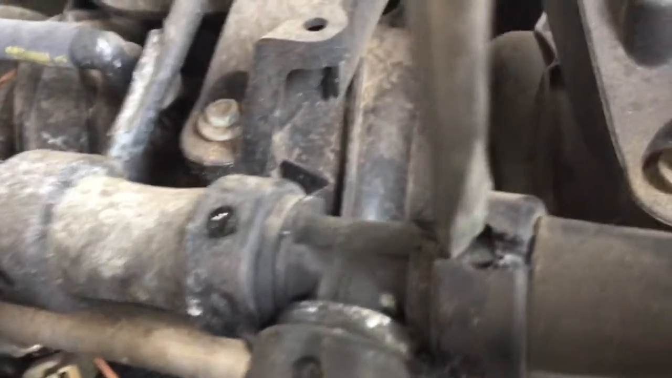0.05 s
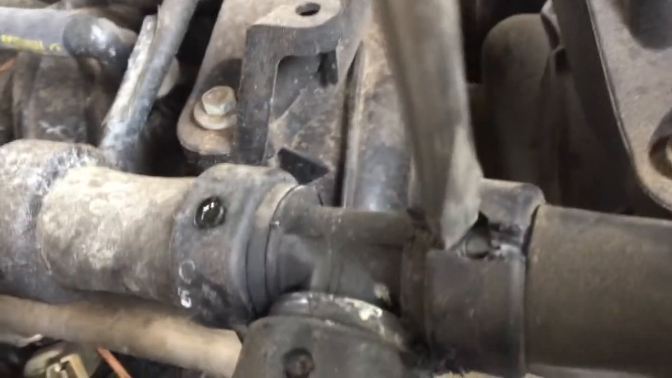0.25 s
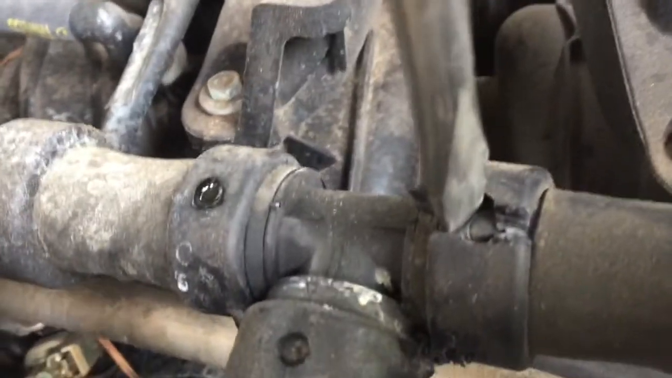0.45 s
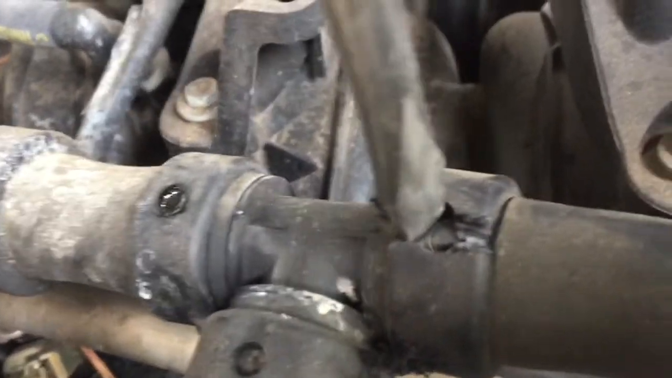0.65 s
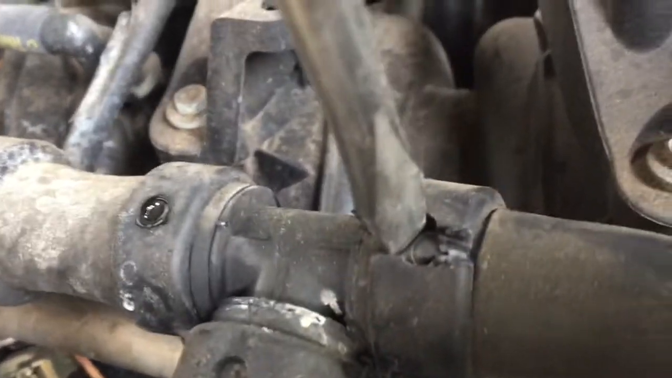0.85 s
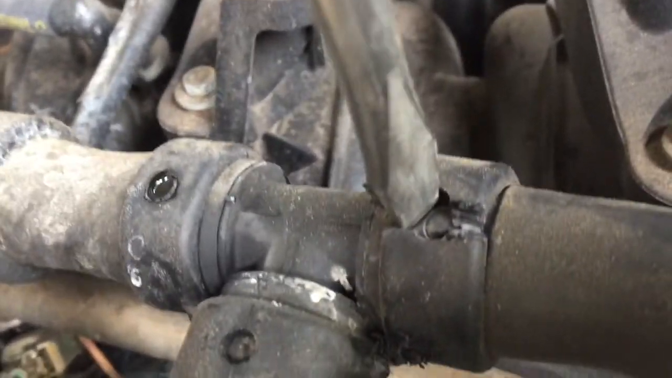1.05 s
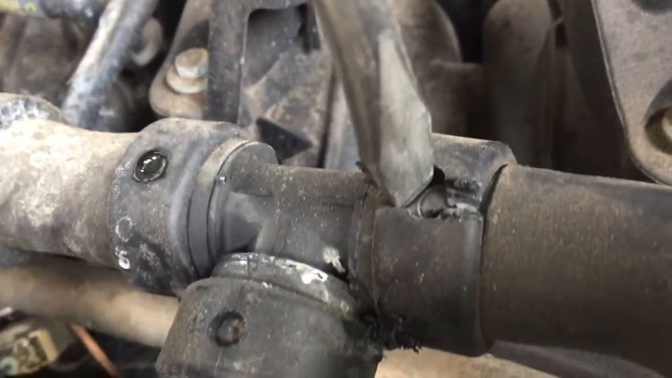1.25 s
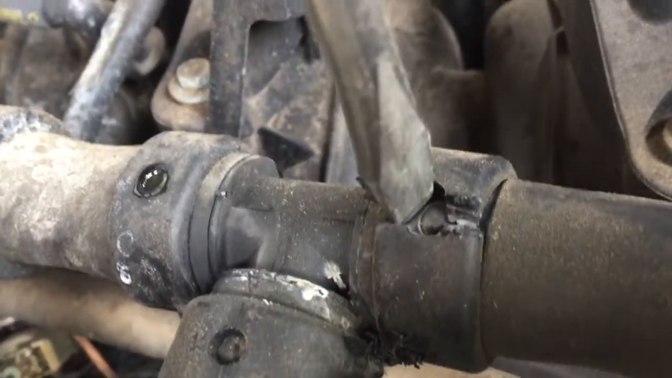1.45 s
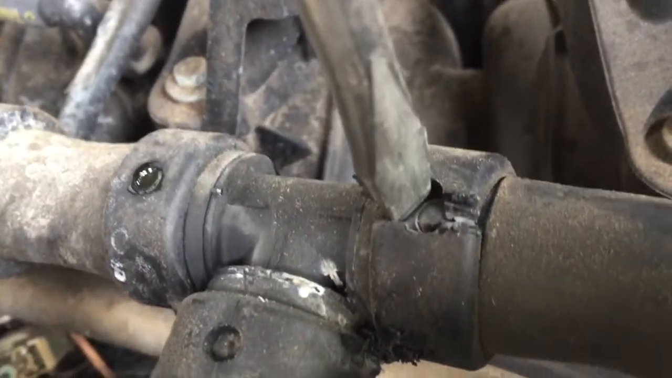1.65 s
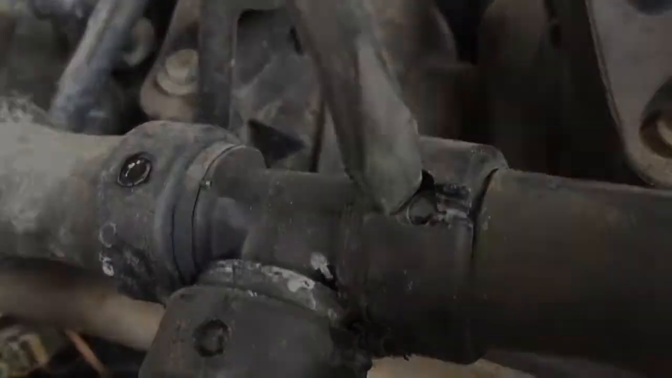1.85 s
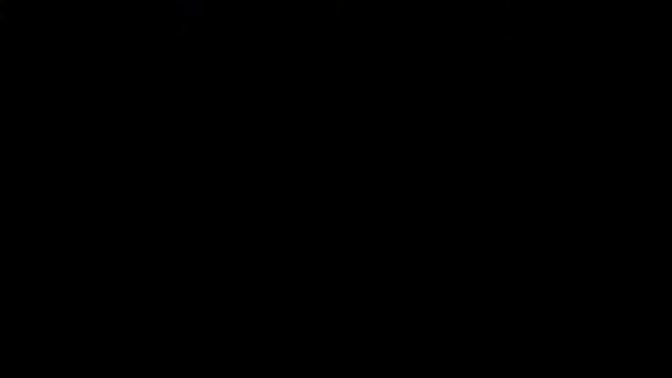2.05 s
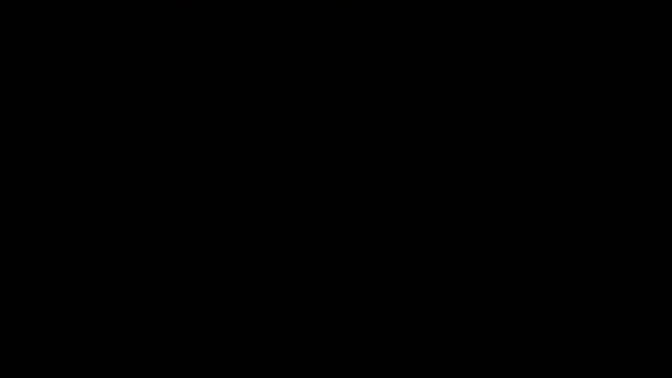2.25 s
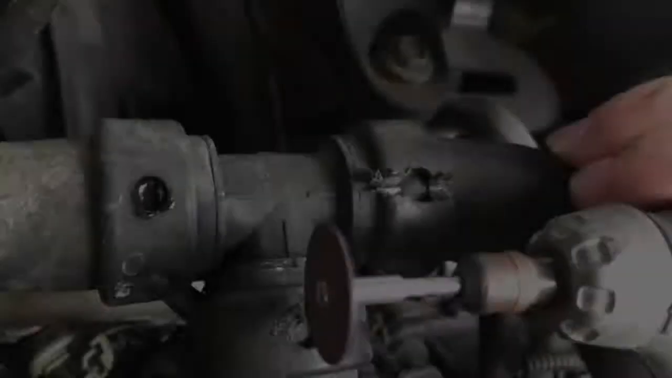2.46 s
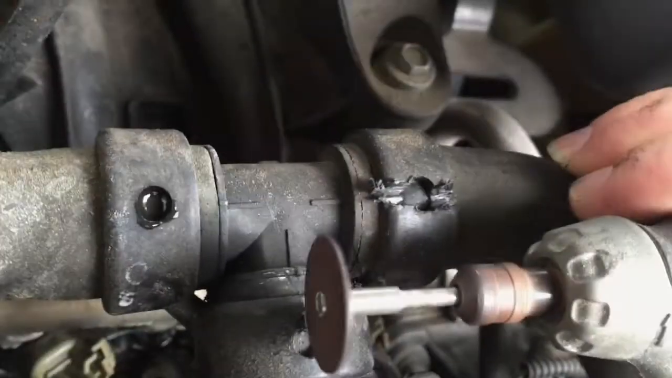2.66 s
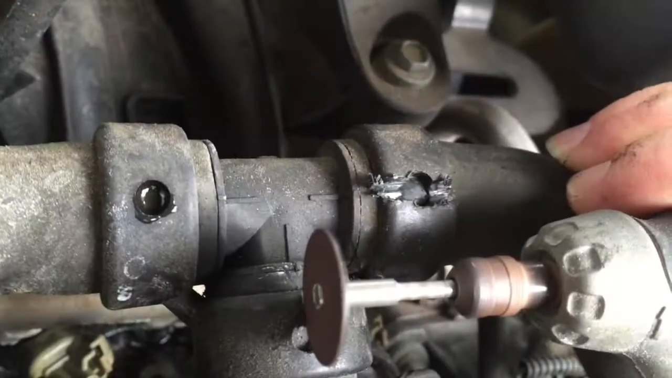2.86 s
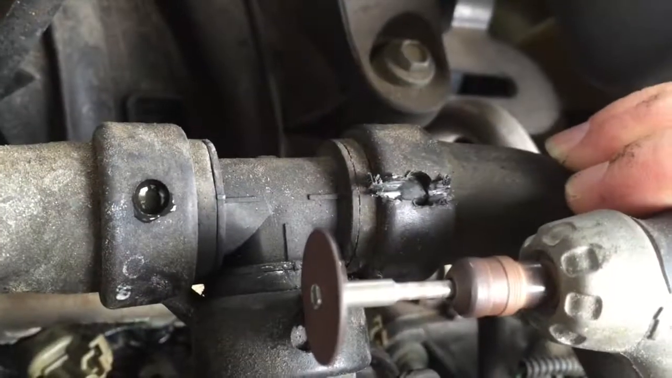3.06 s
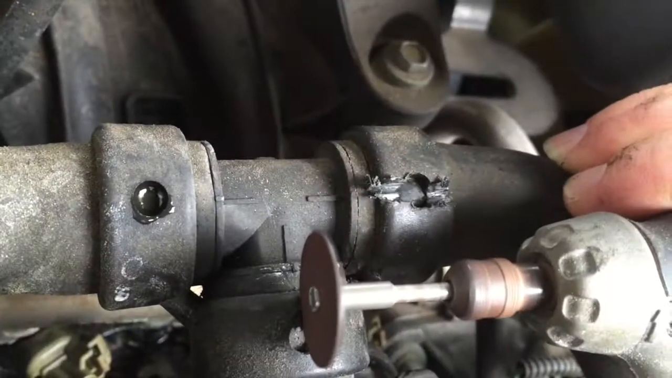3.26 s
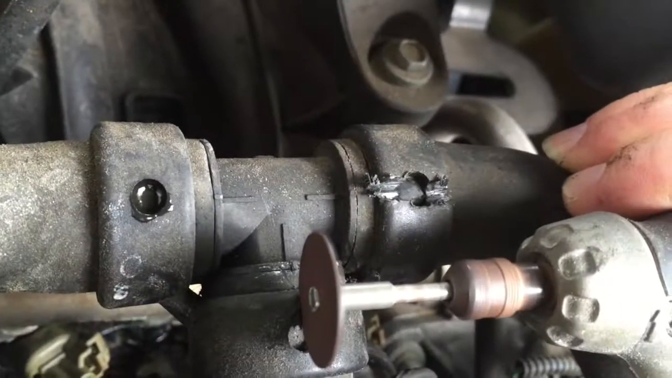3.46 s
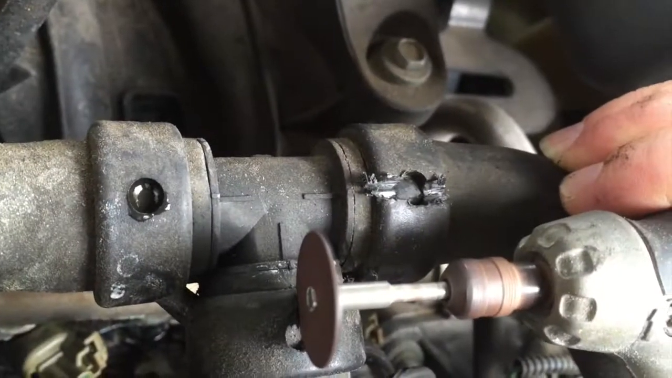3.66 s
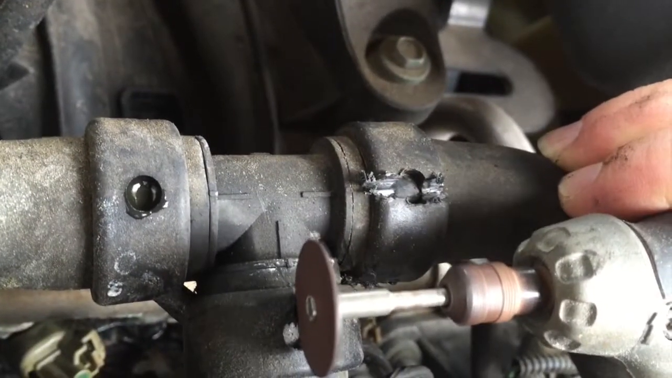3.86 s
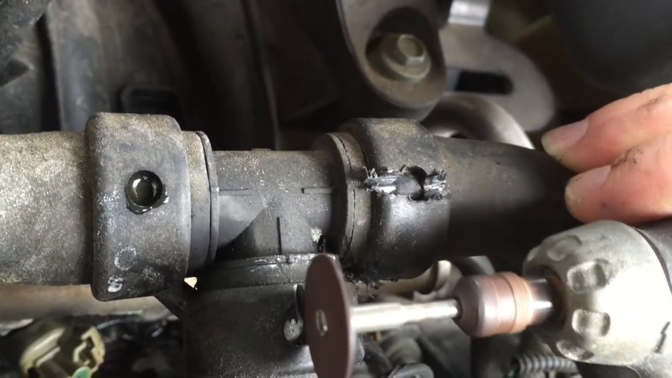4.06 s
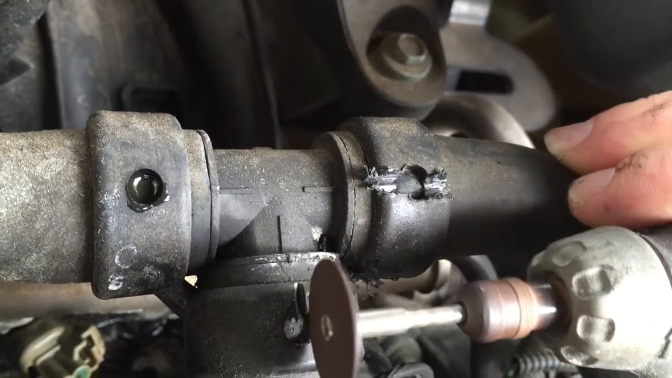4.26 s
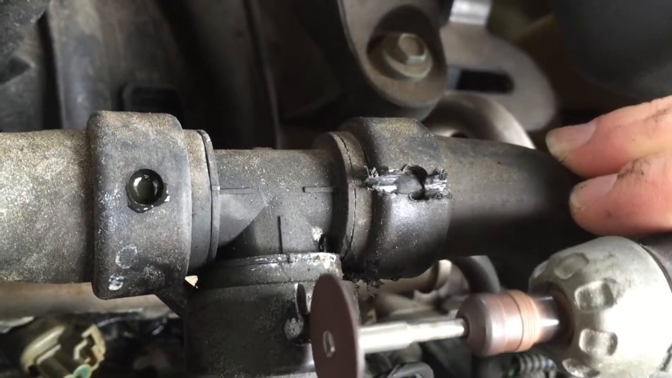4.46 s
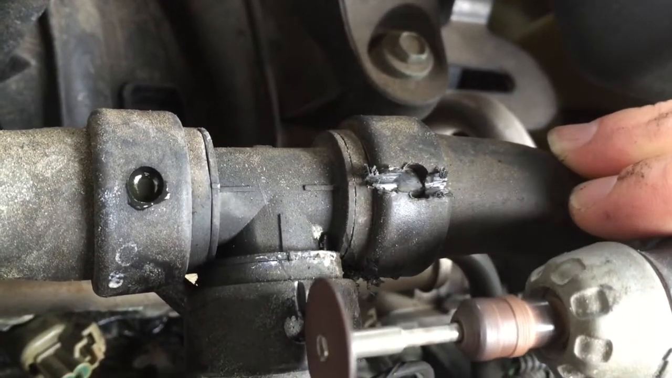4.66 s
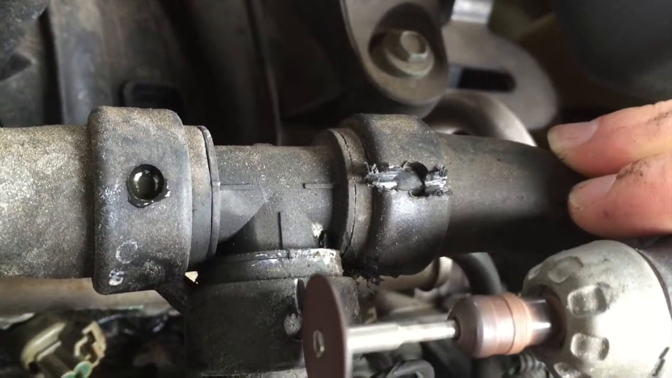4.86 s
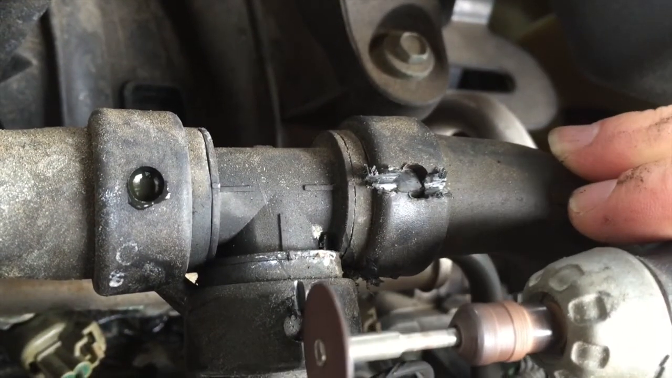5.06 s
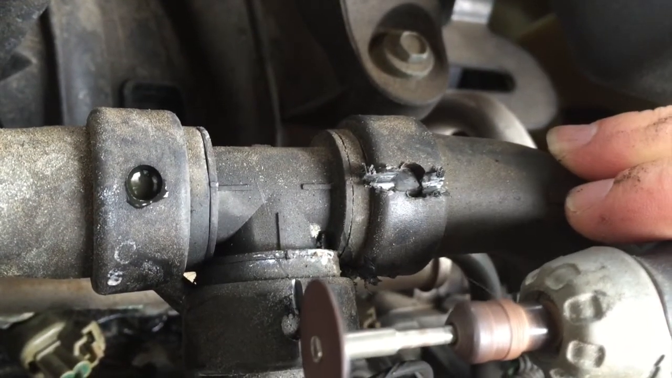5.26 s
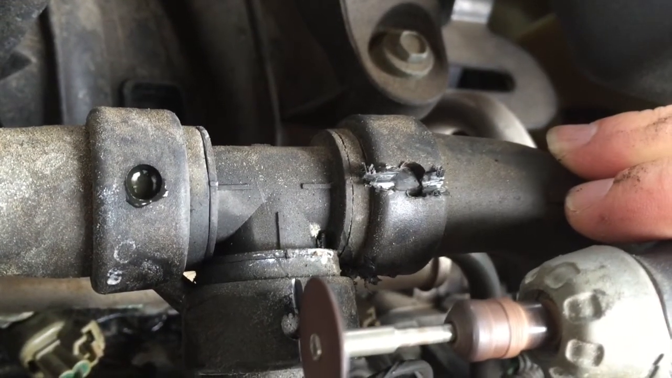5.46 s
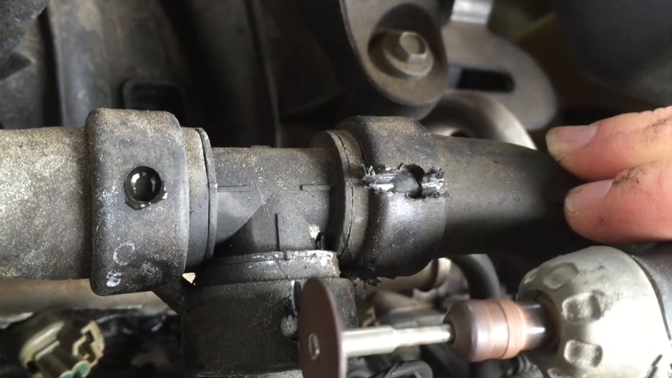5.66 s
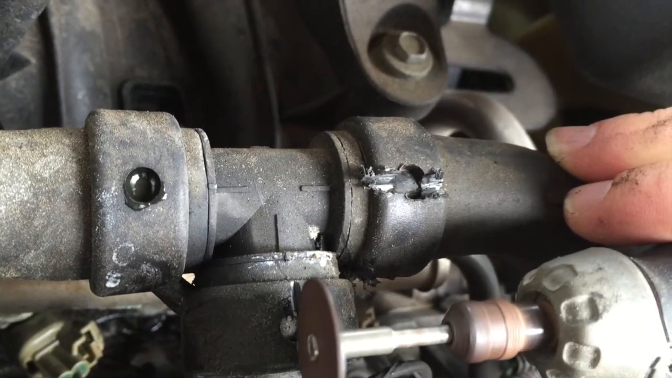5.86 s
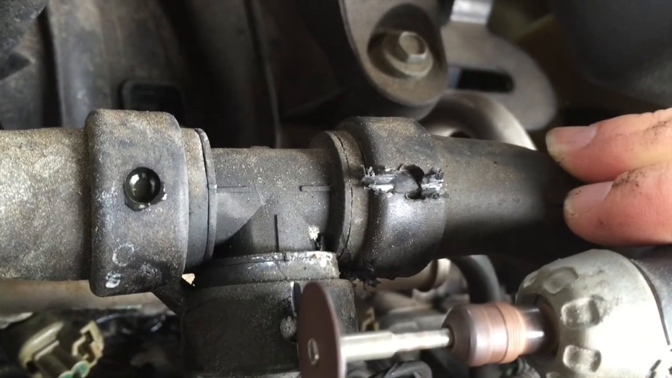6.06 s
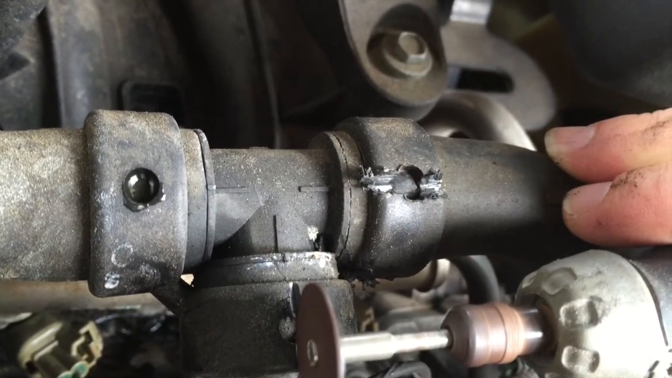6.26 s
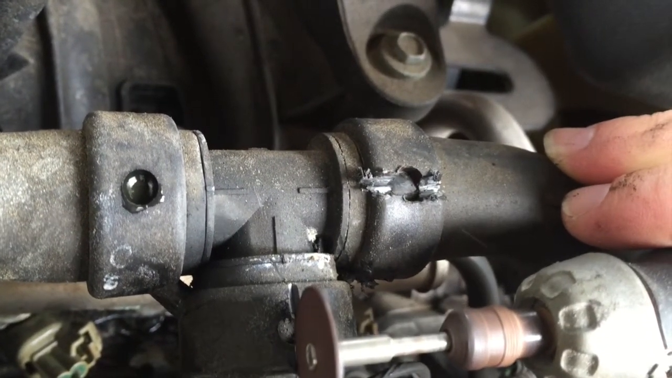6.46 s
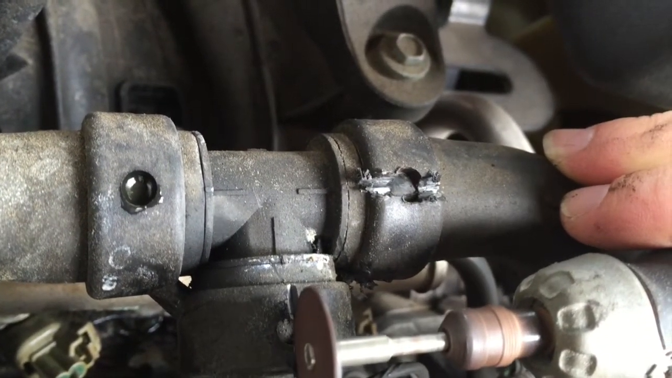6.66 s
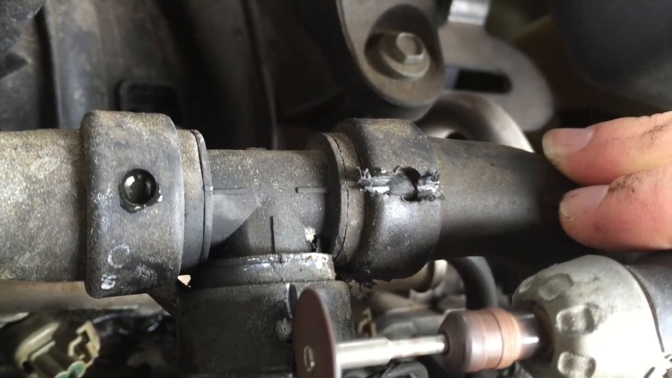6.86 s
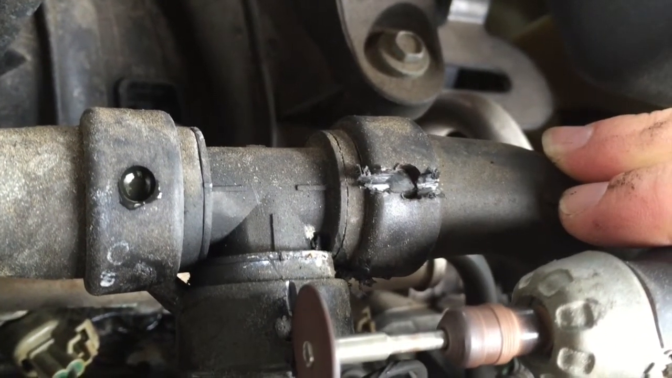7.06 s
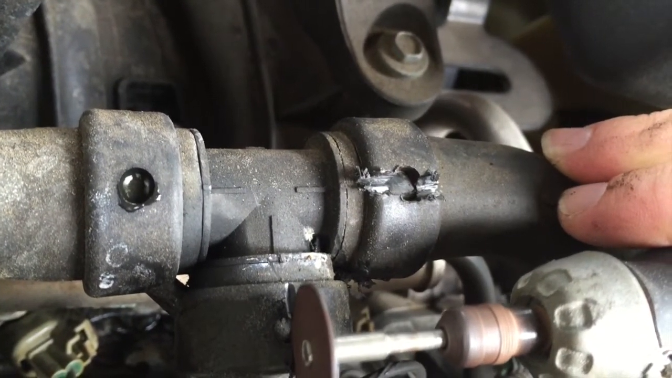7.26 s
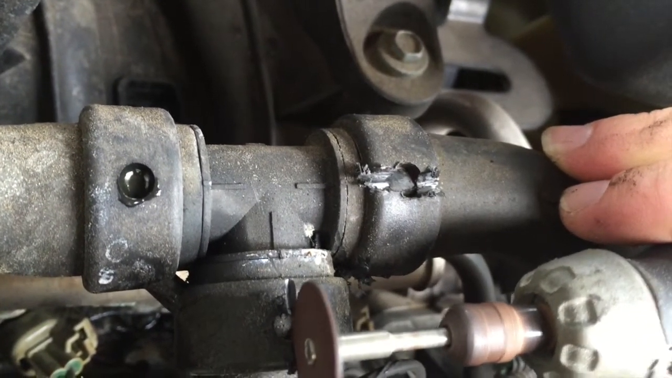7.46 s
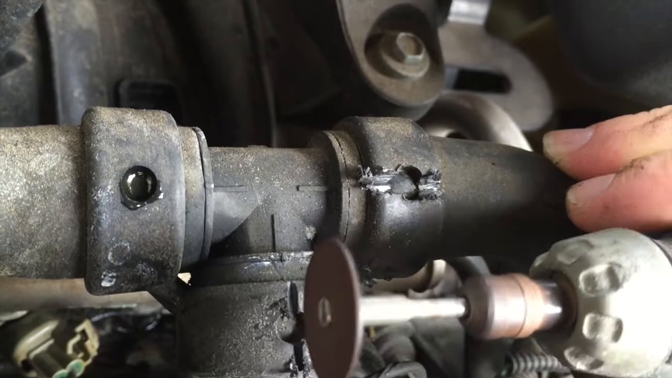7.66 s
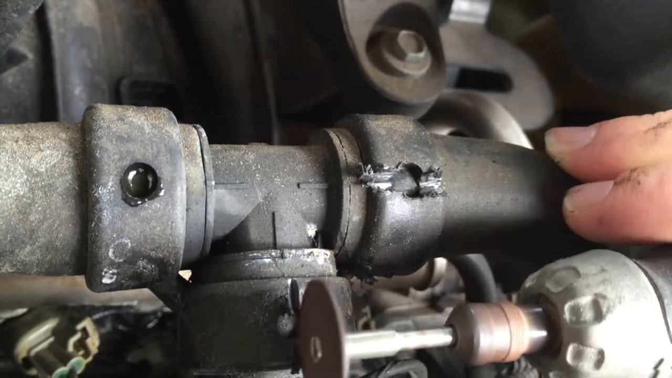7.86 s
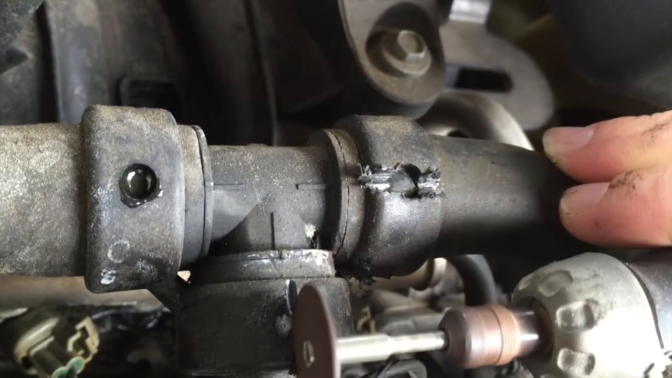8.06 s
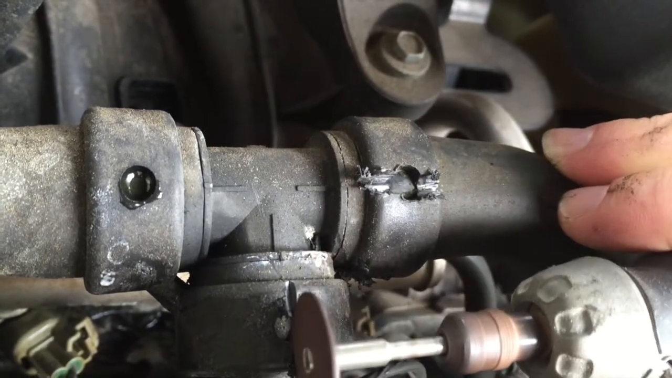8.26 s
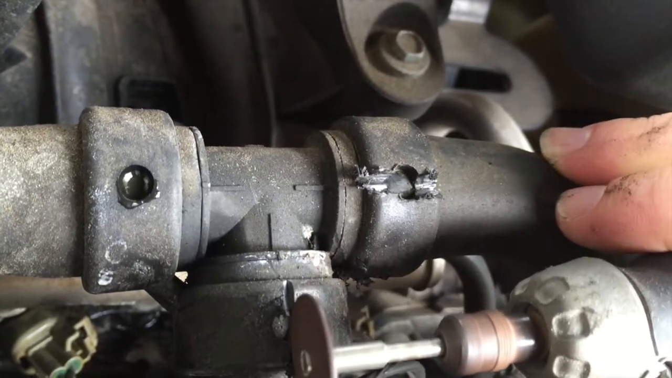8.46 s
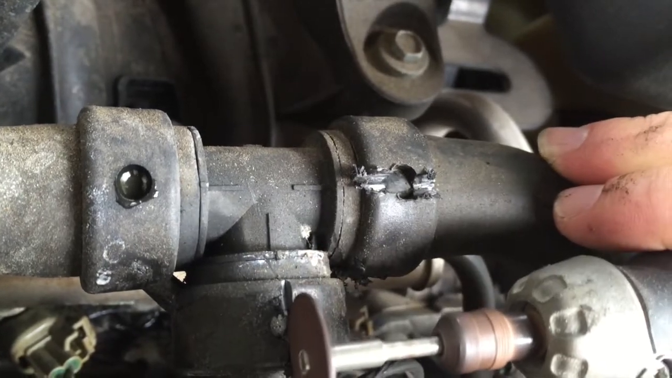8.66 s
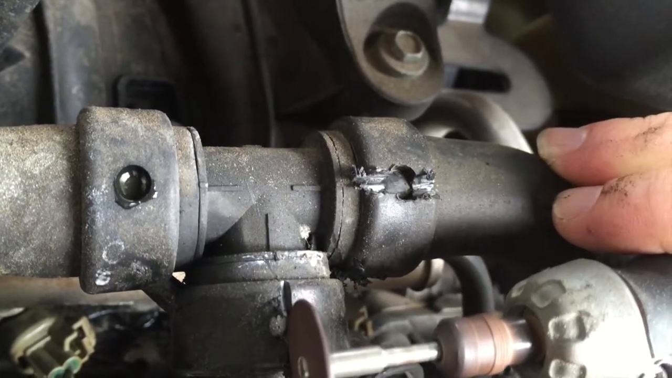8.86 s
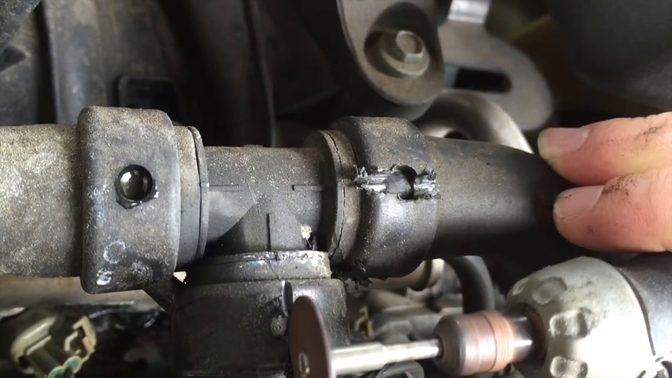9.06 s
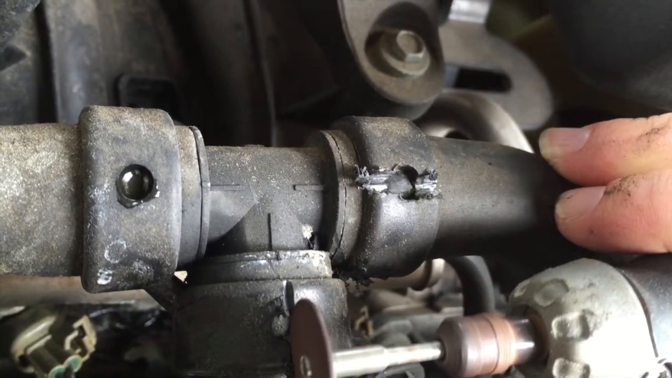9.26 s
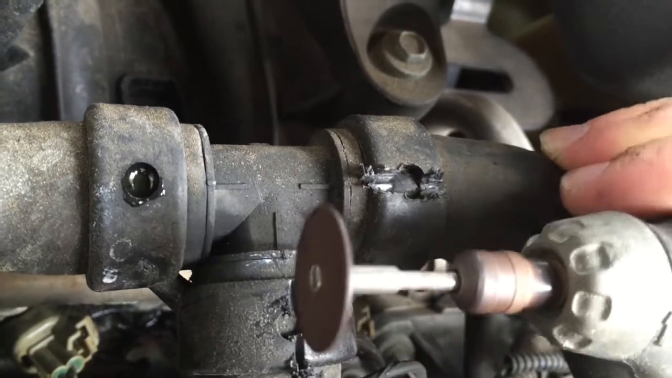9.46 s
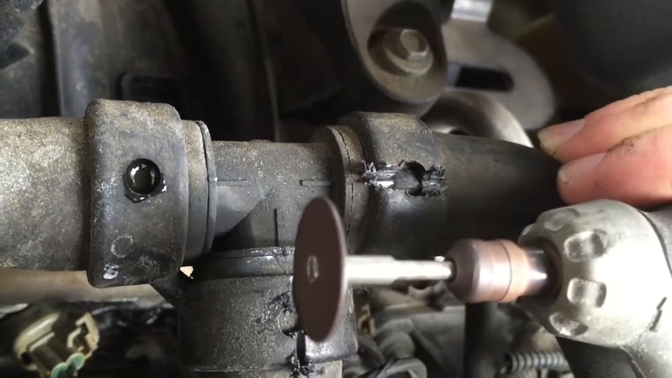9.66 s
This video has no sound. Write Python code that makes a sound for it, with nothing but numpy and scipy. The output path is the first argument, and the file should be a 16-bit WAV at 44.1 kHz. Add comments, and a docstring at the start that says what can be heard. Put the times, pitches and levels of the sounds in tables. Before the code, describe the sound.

A small rotary tool whines up, then bites three times into hard plastic pipe with harsh, rasping buzzes that drag its pitch down.

```python
"""Rotary tool cutting a plastic pipe

A handheld rotary tool is pressed three times into a hard plastic pipe in an engine bay.
The motor whines on sines at multiples of its shaft rate, over fan and brush noise.
The wheel runs slightly out of true and bites once a turn, sometimes bouncing over every other turn:
each bite drives bursts of filtered noise. Cuts drag the whine down; it climbs back as the wheel lifts.
Behind lie hum, drone, rumble and faint early chirps; soft knocks and a scrape come before the motor."""
import sys
import numpy as np
from scipy import signal
from scipy.fft import rfft, irfft, next_fast_len
from scipy.io import wavfile
from scipy.ndimage import uniform_filter1d, map_coordinates

SR = 44100
rng = np.random.default_rng(int(sys.argv[2]) if len(sys.argv) > 2 else 0)


def to_wav(sig):
    """Store sig (one row per channel, or 1-D mono) as 16-bit WAV at the path in sys.argv[1].

    Samples outside -1..1 are clipped; the rate is SR.
    """
    pcm = np.clip(np.atleast_2d(sig), -1, 1) * 32767
    pcm = np.round(pcm).astype(np.int16)
    wavfile.write(sys.argv[1], SR, pcm.T)  # frames by channels


N = 428652
TIME = np.arange(N) / SR
FREE_HZ = 132.8  # the shaft's free speed, turns a second

# how hard the wheel bites, one list per cut:
# (time [s], pipe ring before its mix trim [dB], rasp before its mix trim [dB])
CUTS = [
    [(2.77, -60.5, -43), (2.81, -49, -44), (2.94, -34.4, -36.5), (3.13, -26.5, -32), (3.19, -32.5, -33.5),
     (3.32, -30.5, -36), (3.43, -29, -33.5), (3.56, -31.6, -39), (3.8, -29.8, -36.5), (3.85, -23.5, -33),
     (4.02, -36.4, -35), (4.11, -36, -42.5)],
    [(4.63, -35, -43), (4.7, -44, -51), (4.75, -31, -36.5), (4.96, -32.5, -33.5), (5.09, -27, -30),
     (5.28, -31, -32), (5.41, -27.5, -31), (5.65, -30.5, -31.0), (5.71, -27, -31.5), (6.03, -33.5, -38),
     (6.44, -26.5, -31.5), (6.62, -29, -35.5), (6.96, -27.5, -33), (7.03, -31.5, -37), (7.25, -26, -34),
     (7.35, -30.5, -34.4), (7.49, -34, -41.5), (7.55, -49, -48)],
    [(7.85, -45, -50.5), (7.98, -31, -37), (8.05, -27.5, -33.1), (8.24, -33.3, -38), (8.28, -30, -30.5),
     (8.34, -29, -36.5), (8.44, -33, -36.5), (8.51, -28, -33.4), (8.56, -28.5, -36), (8.98, -27.5, -34.6),
     (9.09, -32.8, -42.5), (9.25, -24.5, -34), (9.41, -42.2, -47.5)],
]
# the wheel bounces over every other turn: (start [s], end [s], turn that hits [0 even, 1 odd])
BOUNCES = [(3.06, 3.28, 1), (4.76, 5.55, 0)]


def amp(db):
    """Decibels to gain."""
    return 10 ** (np.asarray(db) / 20)


def unit(x):
    """Scale to rms 1."""
    return x / np.sqrt(np.mean(x ** 2) + 1e-20)


def steady(x):
    """Even out the loudness to a running rms of about 1."""
    power = uniform_filter1d(uniform_filter1d(x * x, size=2800), size=2800)
    return x / np.sqrt(np.abs(power) + 1e-6 * np.mean(x * x))


def curve(rows):
    """Draw (time, value) rows as one value per sample."""
    return np.interp(TIME, *np.transpose(rows))


def gains(tables):
    """One smoothed gain per sample for each dB column; silent between the tables."""
    total = 0
    for rows in tables:
        s, *columns = np.transpose(rows)
        active = (TIME >= s[0]) * (TIME <= s[-1])
        total = total + np.array([amp(np.interp(TIME, s, db)) * active for db in columns])
    return np.abs(uniform_filter1d(total, size=600, axis=1))


def wobble(rate, order=3):
    """A smooth random curve with `rate` knots a second."""
    coarse = TIME[::100]
    knots = rng.standard_normal(int(N * rate / SR) + 4)
    return np.interp(TIME, coarse, map_coordinates(knots, [coarse * rate], order=order))


def coloured(x, points):
    """Minimum-phase filter through (frequency, dB) points: it rings after a blow, never before."""
    m = 2 * next_fast_len(N // 2 + SR // 4)
    hz, db = np.transpose(points)
    bins_hz = np.fft.rfftfreq(m, 1 / SR)
    gain_db = np.interp(np.log(bins_hz + 1), np.log(hz), db)
    # folding the cepstrum forward in time makes the filter causal
    cepstrum = irfft(np.log(amp(gain_db)))
    cepstrum[1:m // 2] *= 2
    cepstrum[m // 2 + 1:] = 0
    return irfft(rfft(x, m) * np.exp(rfft(cepstrum)), m)[:N]


def noise(points):
    """Coloured noise of rms 1."""
    return unit(coloured(rng.standard_normal(N), points))


def background(count=6):
    """Distant machinery: wavering sine hum and drone, filtered-noise rumble; and a cricket's faint chirps."""
    # steady hum partials: (frequency [Hz], rms level [dB])
    hum_partials = [(53.8, -63.5), (161.5, -61.5), (382, -86.5), (414.5, -85.5)]
    # rumble colour: (frequency [Hz], relative filter gain [dB])
    rumble_colour = [(20, -37), (45, -23), (80, -4), (112, -1.5), (175, -17), (240, -14), (330, -31),
                     (600, -34), (1100, -34.5), (1500, -39.5), (4000, -44.5), (5200, -48), (8500, -51),
                     (15800, -61)]
    # the drone swells once: (start [s], end [s], extra level [dB], ramp [s])
    drone_swell = (1.08, 1.84, 10, .12)
    drone_db, drone_hz, rumble_db = -62, 119.8, -56.5
    chirp_first_s, chirp_every_s, chirp_half_s = .14, .287, .044
    chirp_db, chirp_fade_db = -81, 2  # each chirp is weaker than the last

    hum = 0
    for hz, db in hum_partials:
        hum = hum + amp(db + wobble(10.0)) * np.sin(2 * np.pi * hz * TIME + 0.37 * wobble(2.5))

    start, end, extra_db, ramp_s = drone_swell
    swelling = np.clip(.5 + np.minimum(TIME - start, end - TIME) / ramp_s, 0, 1)
    drone_gain = amp(drone_db + extra_db * swelling + 0.61 * wobble(12))
    drone = drone_gain * np.sin(2 * np.pi * drone_hz * TIME + .5 * wobble(7))

    chirp_gain = 0
    for k in range(count):
        from_peak = TIME - chirp_first_s - chirp_every_s * k
        chirp_gain = chirp_gain + amp(chirp_db - chirp_fade_db * k) * np.exp(-(from_peak / chirp_half_s) ** 2)
    chirps = chirp_gain * noise([(6000, -67), (6750, -10), (6930, 2), (7100, -13), (7800, -63)])
    return np.sqrt(2) * (hum + drone) + amp(rumble_db) * noise(rumble_colour) + chirps


def handling():
    """Two soft knocks, each a decaying sine with some noise, and a short noise scrape of a blade tip."""
    # soft knocks: (time [s], starting level of the sine [dB], pitch [Hz])
    bumps = [(0.804, -40, 180), (1.213, -39.5, 150)]
    # the blade tip scrapes the pipe: (time [s], level before attack and decay [dB])
    scratch = (1.718, -54.5)
    out = np.zeros(N)
    for s, db, hz in bumps:
        t = np.maximum(TIME - s, 0)
        grain = noise([(100, 3), (350, -20), (600, -13), (2500, -22), (12000, -46)])
        thud = np.sin(2 * np.pi * hz * t) + 0.1 * grain
        out += amp(db - 60 * t / 0.072) * (t > 0) * thud  # falls 60 dB in 72 ms

    s, db = scratch
    scrape = noise([(700, -26), (1350, 4), (2000, -14), (2600, 2), (4500, -13), (6300, 2), (8000, -5), (15000, -18)])
    t = np.maximum(TIME - s, 0)
    return out + amp(db - 60 * t / 0.12) * (1 - np.exp(-t / .002)) * scrape


def shaft_speed():
    """The shaft runs free, labours through each cut and springs back when the wheel lifts."""
    # drag curves, one list per cut: (time [s], shaft speed [turns a second])
    drag_curves = [
        [(2.77, 133.0), (2.96, 129.1), (3.09, 129.0), (3.29, 113.5), (3.51, 107.4), (3.65, 96.7), (3.74, 92.4),
         (3.95, 105.0), (4.12, 118.7)],
        [(4.6, 132.2), (4.91, 131.2), (5.27, 126.4), (5.44, 118.0), (5.62, 112.1), (5.92, 97.8), (6.09, 97.8),
         (6.49, 89.1), (6.95, 87.2), (7.2, 84.8), (7.36, 73.6), (7.48, 85.1), (7.57, 102.4)],
        [(7.93, 130.9), (8.01, 127.4), (8.2, 108.4), (8.46, 95.2), (8.71, 87.5), (8.9, 87.4), (9.01, 83.9),
         (9.19, 87.2), (9.34, 87.2), (9.45, 105.3)],
    ]
    recover_s = .07  # time constant of regaining speed
    speed = np.full(N, FREE_HZ)
    for rows in drag_curves:
        touch, lift = rows[0][0], rows[-1][0]
        sag = (FREE_HZ - curve(rows)) * np.exp(-np.maximum(TIME - lift, 0) / recover_s)
        speed = np.where(TIME < touch, speed, FREE_HZ - sag)
    return speed


def once_a_turn(turns, life, size=400):
    """The roughness of a spinning surface: it repeats each turn and wears into a new one over `life` turns."""
    age = turns / max(life, 1)
    surface = rng.standard_normal((int(turns[-1]) + 3, size))
    return unit(map_coordinates(surface, [age, turns % 1 * size], order=2, mode="grid-wrap"))


def motor(speed, turns):
    """Shaft orders sweep through the case resonance and fade as the shaft slows; the air noise barely does."""
    # armature, commutator and fan: (multiple of the shaft rate [ratio], level before case and trim [dB])
    shaft_orders = [(8, -59.5), (13, -69), (14, -70), (15, -72), (16, -47), (18, -52), (22, -59.5),
                    (24, -52), (25, -52.5), (28, -60.5), (29, -78), (31, -59), (32, -57), (33, -59.5),
                    (41, -62), (43, -63), (45, -65), (48, -61.5), (54, -62), (63, -66.5), (72, -67),
                    (87, -74)]
    # the motor case rings: (centre [Hz], width [Hz], boost [dB])
    housing = (2125, 92, 9.6)
    # colour of fan air and brushes: (frequency [Hz], relative filter gain [dB])
    air_colour = [(120, -29), (220, -8), (900, -10.5), (1070, -1.5), (1250, -7), (1500, 0), (1850, 6),
                  (2150, 4), (2400, -7), (3000, -6.5), (3600, -4), (4200, -4), (4750, -12.5), (5900, -10.5),
                  (8400, -14.5), (10500, -17.5), (12500, -17.5), (15800, -29)]
    trim_db, fade_in_at_s, fade_in_s = 1.86, 1.742, 1.025
    shaft_shake = .002  # unsteadiness of the shaft, turns

    pace = speed / speed.max()
    case_hz, width_hz, case_db = housing
    whine = np.zeros(N)
    for order, db in shaft_orders:
        detune = 2 * (order * speed - case_hz) / width_hz
        case = 1 + (amp(case_db) - 1) / (1 + detune ** 2)
        flutter = amp(1.2 * wobble(25))
        cycles = order * (turns + shaft_shake * wobble(40)) + rng.random()
        whine += amp(db) * case * flutter * np.sin(2 * np.pi * cycles)

    brushes = unit(coloured(once_a_turn(turns, life=59.9), air_colour))
    air = amp(-45.0) * noise(air_colour) + amp(-49.0) * brushes
    fade = np.sin(np.pi / 2 * np.clip((TIME - fade_in_at_s) / fade_in_s, 0, 1)) ** 2
    return amp(trim_db) * fade * (np.sqrt(2) * whine * pace ** 3.7 + air * pace ** 0.1)


def bouncing(t, start, end):
    """How fully the wheel bounces, 0-1: it starts almost at once and settles gradually."""
    return np.clip(np.minimum((t - start) / 0.02, (end - t) / 0.31), 0, 1)


def bites(turns, skip_db, scatter_db, jitter_s):
    """Time and strength of the wheel's bite on each turn; bounces weaken every other one."""
    # the rim snags on one turn: (time [s], level in place of that turn's own [dB])
    snags = [(3.087, 1), (3.427, 3), (3.577, 2.5), (3.689, 2), (3.849, 6.5), (3.859, 6), (3.869, 6),
             (4.773, 7), (4.987, 2.5), (5.046, 9), (5.078, 7), (5.109, 4.5), (5.171, 5), (5.955, 5),
             (6.823, 4), (6.234, 1), (7.303, 1), (7.372, 1), (7.461, 4.5), (8.502, 3), (8.513, 2),
             (8.523, 3.5), (8.666, 2), (9.186, 3.5)]
    count = np.arange(1, int(turns[-1]))
    when = np.interp(count, turns, TIME)
    chance = rng.standard_normal((len(count), 2))
    db = scatter_db * chance[:, 0]
    for start, end, hitting in BOUNCES:
        db += skip_db * bouncing(when, start, end) * (count % 2 != hitting)
    for s, snag_db in snags:
        db[np.argmin(np.abs(when - s))] = snag_db
    return when + jitter_s * chance[:, 1], amp(db)


def blows(when, size, delay_s):
    """One clean impulse per bite, shared between the two nearest samples."""
    at = np.clip((when + delay_s) * SR, 0, N - 2)
    whole = at.astype(int)
    early = np.bincount(whole, size * (1 - at + whole), N)
    late = np.bincount(whole + 1, size * (at - whole), N)
    return unit(early + late)


def tearing(turns, strokes, rise_s, decay_s, drag, fresh):
    """Grit tears plastic in a burst per bite and drags in between; `fresh` is the part new each time."""
    t = np.arange(SR // 40) / SR
    burst = (1 - np.exp(-t / rise_s)) ** 2 * np.exp(-t / decay_s)
    contact = unit(signal.fftconvolve(strokes, burst)[:N])
    grit = once_a_turn(turns, life=9) + fresh * rng.standard_normal(N)
    return unit((contact + drag) * grit)


def kerfs():
    """Per sample: gain of the opening spray, the knock's dB and how far the cut has gone, 0-1."""
    # how each cut opens and knocks:
    # (spray against rasp [dB], settling time constant [s], knock before load and mix trim [dB])
    openings = [(1.5, 0.96, -48.5), (-23, 0.73, -46), (7, 0.21, -46)]
    state = np.zeros((3, N))
    for rows, (spray_db, settle_s, knock_db) in zip(CUTS, openings):
        touch, lift = rows[0][0], rows[-1][0]
        age = np.maximum(TIME - touch, 0)
        spray_gain = amp(spray_db) * np.exp(-age / settle_s)
        depth = np.minimum(age / (lift - touch), 1)
        state = np.where(TIME < touch - .03, state, [spray_gain, np.full(N, knock_db), depth])
    return state


def shove(speed, turns, pressure, depth):
    """The off-centre wheel sways the pipe once and twice a turn; a bounce moves the second push to half orders."""
    # how far the pipe sways: (rate of shoving [Hz], rms level before touch, push and judder [dB])
    sway_by_rate = [(50, -36), (58, -43), (65, -52), (76, -45.5), (87, -42.5), (100, -43), (114, -54),
                    (132, -45.5), (152, -46), (172, -47), (179, -48), (194, -40), (218, -44), (232, -49),
                    (265, -54)]
    light_touch_db, seated_load = -9, 0.024  # weaker sway, easing off over this share of speed lost
    judder_db, judder_rate = 4, 26  # a labouring wheel judders: depth at a stall, changes a second
    follows, half_order_db = 0.22, -3  # dB of shove per dB of ring; half orders against whole ones
    lag_s, grows_db = 0.047, 5.5  # slow sway trails the push; half its growth in dB through a cut
    load = 1 - speed / FREE_HZ

    def sway(order):
        db = np.interp(order * speed, *np.transpose(sway_by_rate))
        db = db + light_touch_db * np.exp(-np.abs(load) / seated_load)
        return amp(db + judder_db * load * wobble(judder_rate)) * np.sin(2 * np.pi * order * turns)

    bounce = sum(bouncing(TIME - .03, start, end + 0.13) for start, end, _ in BOUNCES)
    halves = amp(half_order_db) * (sway(order=.5) + sway(order=1.5))
    push = pressure ** follows
    keep = np.exp(-1 / (lag_s * SR))
    lagging = signal.lfilter([1 - keep], [1, -keep], push)
    once = lagging * amp(grows_db * (2 * depth - 1.5)) * sway(order=1)
    return np.sqrt(2) * (once + push * ((1 - bounce) * sway(order=2) + bounce * halves))


def cutting(speed, turns):
    """Every bite knocks the pipe, rings its wall and throws chips and dust; knocks grow as the motor labours."""
    # colours of the cut, each: (frequency [Hz], relative filter gain [dB])
    knock_colour = [(150, -31.5), (280, 3.5), (420, 0), (500, -1.5), (620, 5), (790, 3), (880, -1.5),
                    (970, 4.5), (1150, -7.5), (1500, 8), (2500, -45.5)]
    ring_colour = [(800, -62.5), (1200, -22), (1450, -8.5), (1680, -1.5), (1840, 7.5), (2060, -4),
                   (2220, -7), (2420, -56.5), (3200, -47.5)]
    rasp_colour = [(1500, -15.5), (2450, -5.5), (2750, -4), (3020, 5.5), (3280, 0), (3550, 2), (4280, 8.5),
                   (4850, -8), (6250, 0), (6800, -4), (7250, -2), (8500, -2), (10400, -21), (13000, -21)]
    hiss_colour = [(7000, -42), (9700, 2.5), (10600, -11), (12500, 5.5), (13400, -5.5), (15800, -3)]
    spray_colour = [(7000, -7), (9700, 0), (10600, -12), (12500, 2), (13400, -2), (14500, 2), (15800, -2.5)]
    # the kerf spits a puff of dust: (time [s], peak level [dB], half length [s])
    spits = [(3.11, -45, 0.037), (3.356, -34.5, .05), (4.925, -34, .025), (5.44, -40, 0.12),
             (7.303, -38.5, 0.055), (7.52, -43, 0.025), (7.9, -41, 0.077), (9.4, -42, 0.013)]
    tremble_db, tremble_rate = .8, 15  # the hand's unsteady pressure and its changes a second
    firm_db = -30  # the pipe's ring in a firm cut
    knock_follows, knock_load_db = 1, 8  # dB of knock per dB of ring; its gain at a stall
    dust_db = -11  # fine dust against the rasp

    ring_gain, rasp_gain = gains(CUTS) * amp(tremble_db * wobble(tremble_rate))
    spray_gain, knock_db, depth = kerfs()
    pressure = ring_gain / amp(firm_db)
    load = 1 - speed / FREE_HZ
    knock_gain = amp(knock_db + knock_load_db * load) * pressure ** knock_follows
    puffs = sum(amp(db) * np.exp(-((TIME - s) / half_s) ** 2) for s, db, half_s in spits)
    dust_gain = np.hypot(amp(dust_db) * rasp_gain, puffs)

    when, size = bites(turns, skip_db=-55, scatter_db=1.35, jitter_s=.00002)
    strokes = blows(when, size, 0)
    # the pipe wall swings up a moment after the grit has struck
    swing = blows(when, size, 0.00072)
    knock = .5 * blows(when, size, 0.00086)
    knock = knock + tearing(turns, strokes, rise_s=0.00026, decay_s=0.0049, drag=0.13, fresh=0.52)
    ring = .55 * blows(when, size, .002)
    ring = ring + tearing(turns, swing, rise_s=.0006, decay_s=.0018, drag=.05, fresh=.95)
    rasp = tearing(turns, strokes, rise_s=0.00054, decay_s=0.0038, drag=0.034, fresh=1.0)
    hiss = tearing(turns, strokes, rise_s=0.00012, decay_s=0.002, drag=0.27, fresh=1.2)
    spray = tearing(turns, strokes, rise_s=0.00044, decay_s=0.0025, drag=0.29, fresh=0.34)

    chatter = (amp(1.5) * knock_gain * steady(coloured(knock, knock_colour))
               + amp(0.06) * ring_gain * steady(coloured(ring, ring_colour))
               + amp(0.16) * rasp_gain * steady(coloured(rasp, rasp_colour))
               + dust_gain * steady(coloured(hiss, hiss_colour))
               + spray_gain * rasp_gain * steady(coloured(spray, spray_colour)))
    return chatter + shove(speed, turns, pressure, depth)


def grazing(turns):
    """A light touch repeats almost exactly on every turn, so the thin wheel buzzes in clean harmonics."""
    # the rim grazes the pipe: (start [s], end [s], level [dB])
    grazes = [(2.77, 2.885, -32), (2.942, 3.04, -38), (4.62, 4.675, -38), (4.698, 4.757, -38),
              (7.936, 8.024, -43)]
    # colour of the buzzing wheel: (frequency [Hz], relative filter gain [dB])
    wheel_colour = [(900, -61), (1330, -5), (1560, -2), (1750, 4.5), (2500, -22), (3500, 8.5), (3850, 13.5),
                    (4300, 12.5), (4750, -71), (6300, -6), (10500, -1), (12500, 2), (15800, -27)]
    when, size = bites(turns, skip_db=-6, scatter_db=.8, jitter_s=.000005)
    strokes = blows(when, size, 0)
    grit = tearing(turns, strokes, rise_s=0.0019, decay_s=0.0066, drag=.05, fresh=0.17)
    touch = blows(when, size, 0.001045) + .55 * grit
    level = 0
    for start, end, db in grazes:
        contact = np.clip(np.minimum((TIME - start) / 0.0052, (end - TIME) / 0.007), 0, 1)
        level = level + amp(db) * contact
    return level * steady(coloured(touch, wheel_colour))


def squeal(turns):
    """The rim screeches briefly as it first catches: narrow noise that pulses with the wheel."""
    # the screech: (peak time [s], half length [s], level before the pulsing [dB])
    catch = (2.857, .022, -36.5)
    s, half_s, db = catch
    screech = noise([(4200, -40), (5200, -4), (5700, -9), (6300, 3), (7000, -35)])
    pulse = 1 + .5 * np.cos(2 * np.pi * turns)
    return amp(db) * np.exp(-((TIME - s) / half_s) ** 2) * pulse * screech


def engine_bay(x, wet_db, t60_s):
    """Hoses and metal close by throw back a brief, dense echo of the upper range: a decaying noise tail."""
    t = np.arange(SR // 8) / SR
    tail = rng.standard_normal(len(t)) * amp(-60 * t / t60_s) * (t > .001)
    echo = signal.fftconvolve(x, tail / np.linalg.norm(tail))[:N]
    return x + amp(wet_db) * coloured(echo, [(200, -19), (900, -8), (1600, 5.5), (5000, -1), (15000, -1)])


def chip():
    """A loose chip pings off the wheel: a tiny, very bright noise burst that dies at once."""
    # the ping: (time [s], level before attack and decay [dB])
    loose_chip = (4.208, -31)
    s, db = loose_chip
    t = np.maximum(TIME - s, 0)
    ping = noise([(1000, -30), (1600, -4), (2500, -18), (13500, -20), (15300, -5), (15900, -6)])
    return amp(db - 60 * t / .035) * (1 - np.exp(-t / .001)) * ping


def scene():
    """Motor and cut share one shaft; only the wheel's contact sounds echo in the engine bay."""
    speed = shaft_speed()
    turns = np.cumsum(speed) / SR
    contact = cutting(speed, turns) + grazing(turns) + squeal(turns)
    cut = engine_bay(contact, wet_db=-15, t60_s=.05)
    return (background() + handling() + motor(speed, turns) + cut + chip())[None]


def record(dry):
    """A steep low-pass keeps nothing above the band limit."""
    top_hz = 15900
    m = next_fast_len(N + SR // 4)
    kept = np.fft.rfftfreq(m, 1 / SR) < top_hz
    return irfft(rfft(dry, m) * kept, m)[:, :N]


dry = scene()
out = record(dry)
to_wav(out)
```